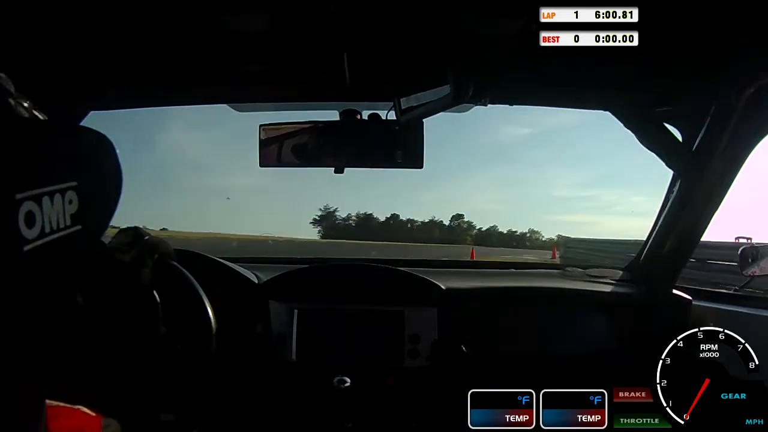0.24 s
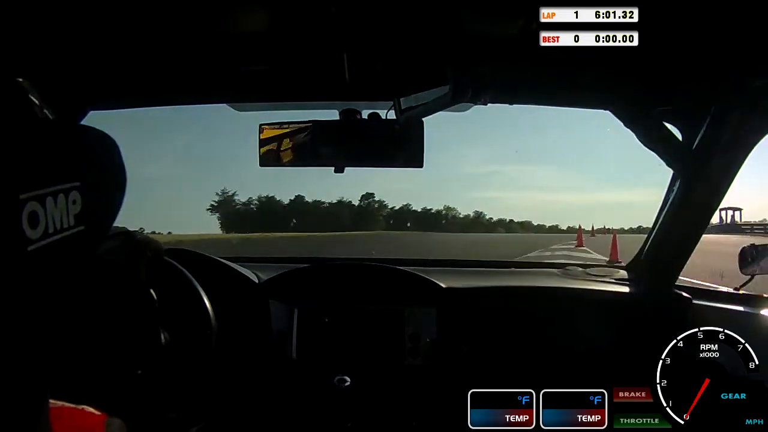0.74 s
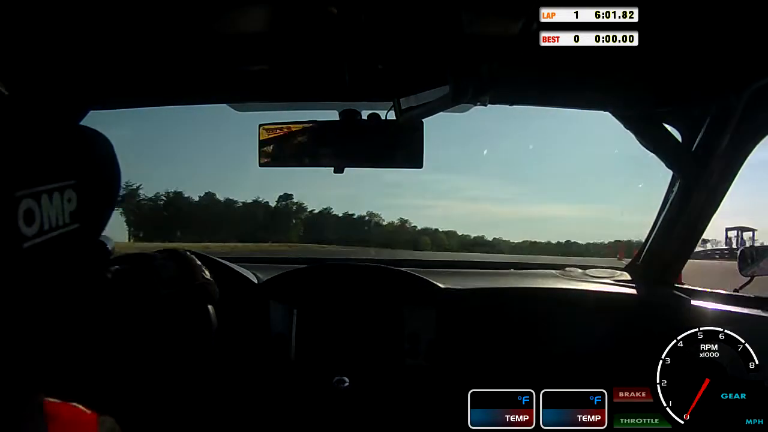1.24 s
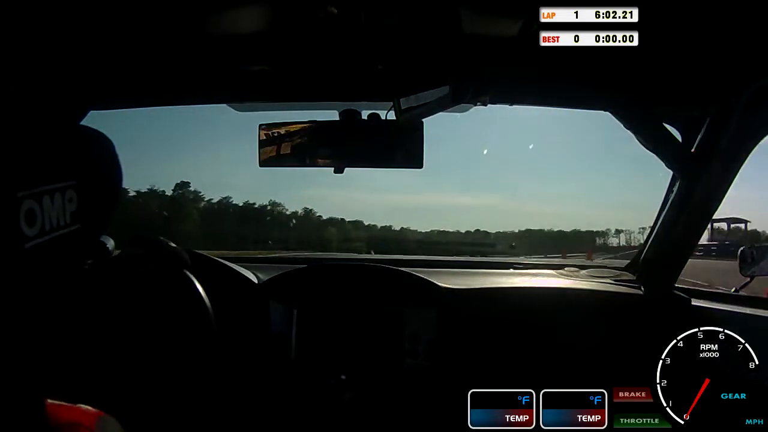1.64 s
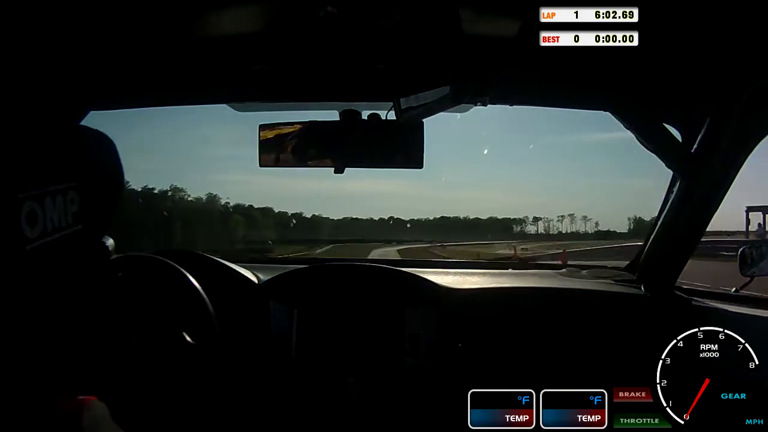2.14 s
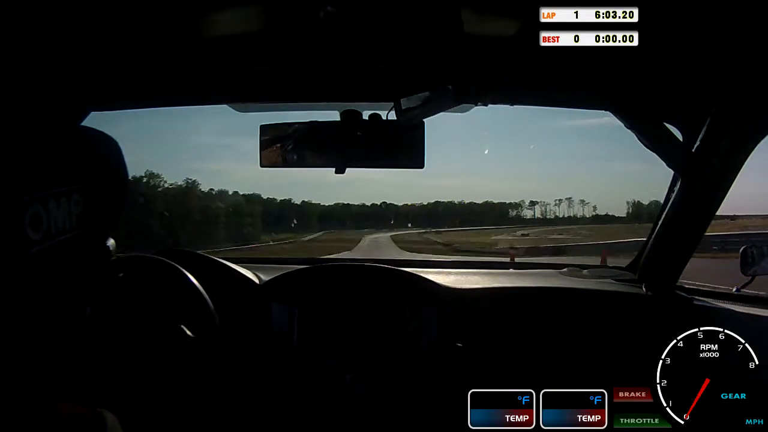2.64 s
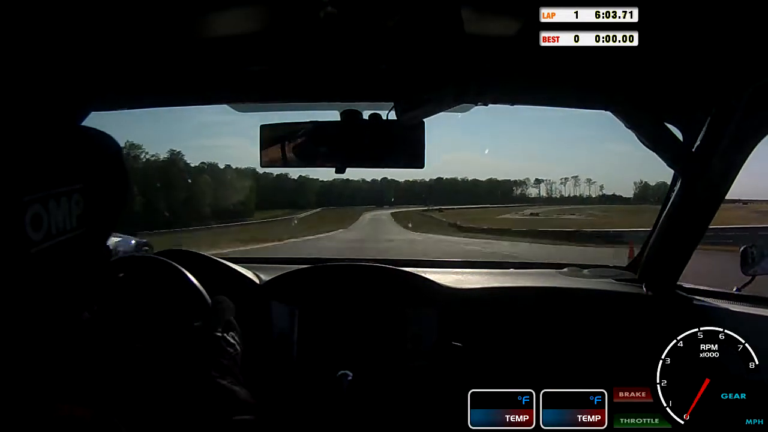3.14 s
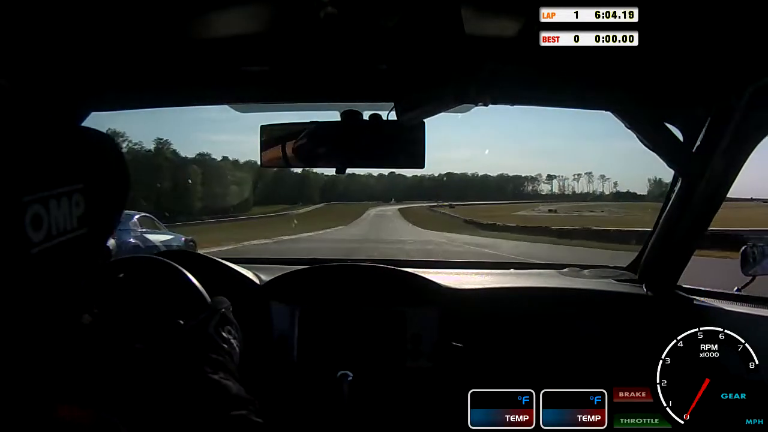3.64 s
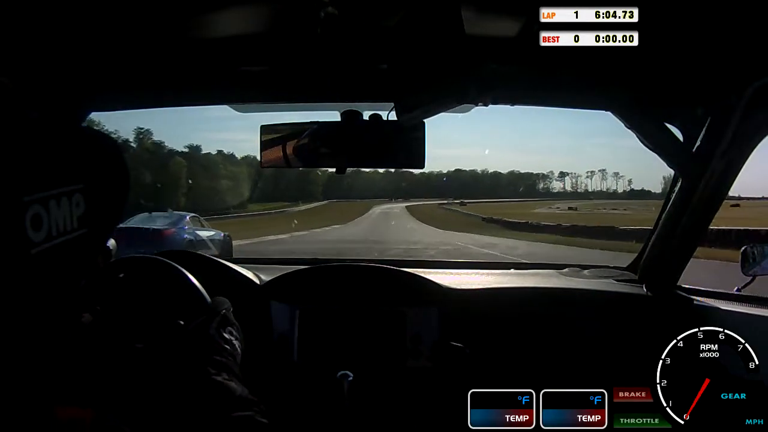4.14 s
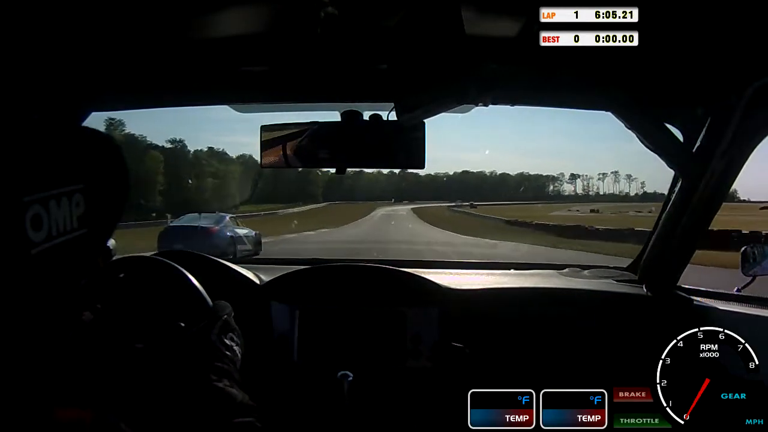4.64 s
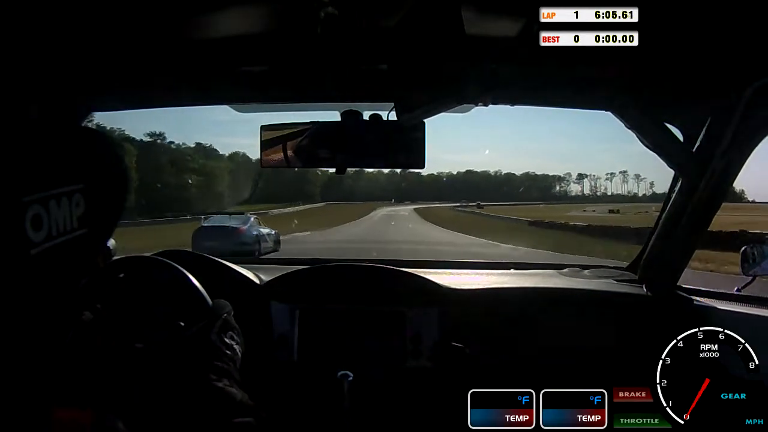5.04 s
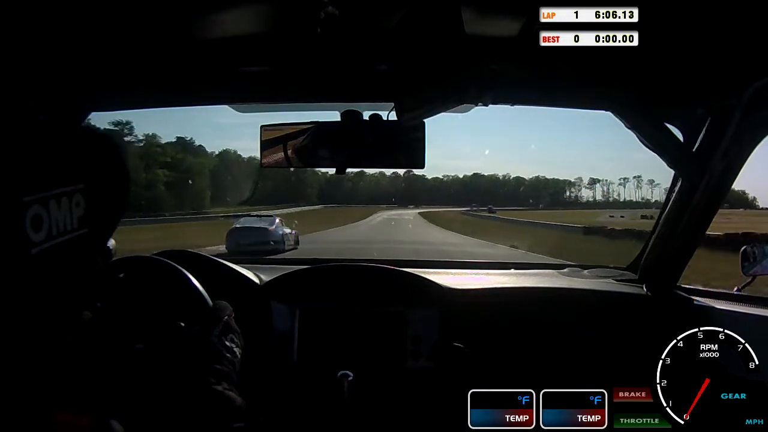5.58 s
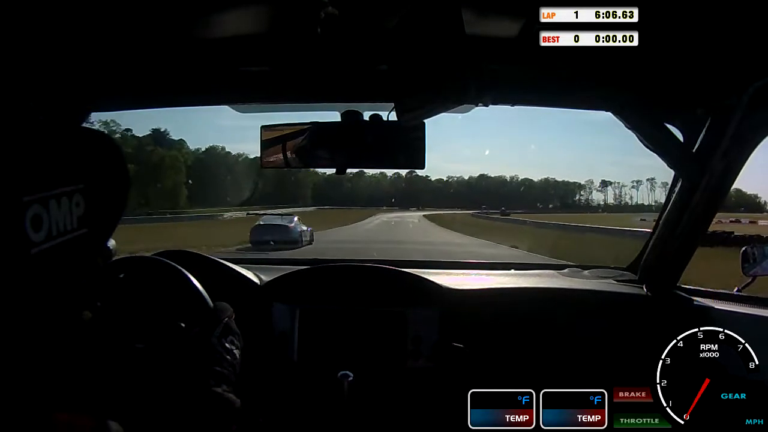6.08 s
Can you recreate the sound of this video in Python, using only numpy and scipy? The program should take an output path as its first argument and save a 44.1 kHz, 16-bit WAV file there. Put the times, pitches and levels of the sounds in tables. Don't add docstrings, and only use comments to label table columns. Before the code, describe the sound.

Inside a hard, boomy racing car cabin, close to a small, slightly overloaded microphone. From 0 to 0.8 s the four-cylinder engine falls on the overrun, its firing note dropping from about 190 to 145 Hz, with thick irregular pops and thumps over road rumble and wind roar. Around 0.85 s a low boom swells briefly, then the clutch lets the engine sink and fade. At 1.4 s a dull gear clunk lands; gearbox hum near 163 Hz, faint high whistle and tiny trim ticks carry a quiet lull while revs sink to about 75 Hz at 2.1 s. At 2.3-2.5 s the throttle opens: revs jump to 150 Hz and a loud raspy bark bursts out with a slight shudder. It then climbs smoothly to about 226 Hz by 6.3 s, steady full-throttle drone with pulsing intake hiss, road noise growing and brief treble dropouts, ending abruptly while still pulling.

```python
import sys
import numpy as np
from scipy import signal
from scipy.io import wavfile
from scipy.ndimage import uniform_filter1d

SR = 44100
rng = np.random.default_rng(int(sys.argv[2]) if len(sys.argv) > 2 else 0)


def inscribe(sig):
    pcm = np.round(np.clip(np.atleast_2d(sig).T, -1, 1) * 32767)
    wavfile.write(sys.argv[1], SR, pcm.astype(np.int16))


def gain_from_db(level_db):
    decades = np.asarray(level_db, float) / 20
    return 10 ** decades


N = 278271

# time in seconds, level in dB.
ROAD = [
    (0, -25),
    (.75, -26),
    (1.05, -29),
    (1.4, -33),
    (2.35, -40.5),
    (2.62, -24),
    (3.0, -34.5),
    (4.2, -29.5),
    (5.0, -28),
    (6.31, -29.5),
]
CLUNK_S, CLUNK_RISE_S = 1.4, 0.02


def blend(pair, share):
    return pair[0] + (pair[1] - pair[0]) * share


def evened(x):
    return x / np.sqrt(np.mean(x ** 2) + 1e-20)


def columns(rows):
    s, *values = np.transpose(rows)
    return [np.interp(np.arange(N) / SR, s, v) for v in values]


def noise(spectrum, patchy_db):
    hz = np.fft.rfftfreq(1024, 1 / SR)
    a, b, patches = rng.standard_normal((N // 256 + 5, 513, 3)).T
    patches = uniform_filter1d(patches, size=8, axis=0)
    patches = evened(uniform_filter1d(patches, size=10, axis=1))
    f, db = np.transpose(spectrum)
    colour_db = np.interp(np.log(hz + 1), np.log(f + 1), db)[:, None]
    z = (a + 1j * b) * gain_from_db(colour_db + patchy_db * patches)
    return evened(signal.istft(z, nperseg=1024, noverlap=768)[1][:N])


def drive():
    # time in seconds, firing rate in Hz, boom in dB, effort in dB.
    controls = [(0, 190.3, -18, -34), (.3, 171, -19.5, -32.5), (.7, 148.3, -22, -30.5),
                (.85, 140.9, -12.5, -27.5), (1.0, 129.4, -12.5, -34), (1.2, 116, -14.5, -39.5),
                (1.6, 97.3, -25, -56), (2.1, 75.3, -30, -42.5), (2.29, 80.54, -32, -39.5),
                (2.35, 97, -19, -25.5), (2.42, 138.9, -11, -15), (2.465, 148.5, -9, -11.5),
                (2.95, 156.2, -13, -13.5), (3.73, 174.2, -12, -16), (4.3, 186, -10, -16),
                (5.3, 206.4, -10.5, -13.5), (5.9, 217.9, -12, -13), (6.31, 226, -12.5, -14)]
    # start in seconds, rev swing in Hz.
    jolts = [
        (2.464, 3.0),
        (3.253, 1.7),
    ]
    jolts_per_s, fade_s = 7.2, .17
    shut_db, open_db = -21.5, -16.5
    hz, boom_db, effort_db = columns(controls)
    t = np.arange(N) / SR
    for s, swing_hz in jolts:
        after_s = np.maximum(t - s, 0)
        hz = hz + swing_hz * np.sin(2 * np.pi * jolts_per_s * after_s) * np.exp(-after_s / fade_s)
    throttle = np.clip((effort_db - shut_db) / (open_db - shut_db), 0, 1)
    gear = np.clip((t - CLUNK_S) / CLUNK_RISE_S + 1, 0, 1)
    return hz, boom_db, effort_db, throttle, gear


def pipe(x, heat, floor_db=-42):
    # frequency in Hz, width in Hz, level in dB.
    resonances = [(220.4, 112, 8.5), (351.4, 60, -1), (465, 101, -2), (626.6, 75, 0), (745.4, 94, 3.5),
                  (832.7, 80, -1.5), (946, 28, -9), (1118, 150, -21.5), (1328, 163, -10), (1830, 154, -18),
                  (2034, 250, -22), (2496, 208, -20.5), (2904, 270, -24), (3478, 165, -23.5),
                  (4137, 165, -29), (5060, 130, -41)]
    hz = abs(np.fft.fftfreq(8192, 1 / SR))
    gain = gain_from_db(floor_db) / (1 + (hz / 2800) ** 6)
    for f, width_hz, db in resonances:
        gain = gain + gain_from_db(db) / (1 + (2 * (hz - f * heat) / width_hz) ** 2)
    taps = np.fft.ifft(np.exp(np.conj(signal.hilbert(np.log(gain))))).real[:3000]
    return signal.oaconvolve(x, taps)[:N]


def boom(hz, turns, size_db, throttle):
    overtone_db, mode_hz, mode_width_hz, lag_rad = -16.5, 238, 52, .65
    size = gain_from_db(.45 * uniform_filter1d(size_db, size=300))
    tone = np.cos(2 * np.pi * turns - lag_rad) * size
    mode = 1 / (1 + (2 * (2 * hz - mode_hz) / mode_width_hz) ** 4)
    overtone = gain_from_db(overtone_db) * (1 - throttle) * mode * np.cos(4 * np.pi * turns)
    return -np.sqrt(2) * (tone + overtone)


def engine(hz, boom_db, bark_db, throttle):
    cylinders_db = [0.48, -0.49, 0.35, -0.46]
    uneven_db = blend((2.2, 1.05), throttle)
    sharp_db = blend((-9, 1.78), throttle) - 0.0053 * throttle * (hz - 185)
    wobble = evened(uniform_filter1d(rng.standard_normal(N), size=900))
    turns = np.cumsum(hz * (1 + .0015 * wobble)) / SR
    firing = np.floor(turns + .5).astype(int)
    chance = np.clip(rng.standard_normal((2000, 2)), -1.6, 1.6)[firing]
    size_db = np.array(cylinders_db)[firing % 4] + uneven_db * chance[:, 0]

    mid_revs = np.exp(-((hz - 196.5) / 29.8) ** 2)
    shift_firings = blend((0.0079, 0.019), throttle * mid_revs)
    drift = shift_firings * np.sin(2 * np.pi * turns / 4 + 0.95)
    arrival = turns + .0014 * uneven_db ** 2 * uniform_filter1d(chance[:, 1], size=60)
    edge = gain_from_db(sharp_db) - 1
    pulses = 0
    for k in range(2, 32):
        level = 1 + edge * np.clip(k * hz / 200 - 4.5, 0, 1)
        pulses = pulses - level * np.cos(2 * np.pi * (k * arrival + min(k, 7) * drift))

    gas = np.diff(rng.standard_normal(N + 1)) * (.4 + np.exp(-(turns % 1) / .35))
    gas_db = 11 + sharp_db - .06 * throttle * (hz - 167)
    flow = pulses * gain_from_db(size_db) + gain_from_db(gas_db) * gas
    hot = throttle * np.clip((hz - 150) / (190 - 150), 0, 1)
    bark = blend((pipe(flow, 0.98), pipe(flow, 1.005)), hot)
    bark /= np.sqrt(abs(uniform_filter1d(bark ** 2, size=6000)) + 1e-9)
    return gain_from_db(boom_db) * boom(hz, turns, size_db, throttle) + gain_from_db(bark_db) * bark, turns


def rumble(hz, throttle):
    # frequency in Hz, density in dB per Hz.
    rumble_colour = [(12, -42.5), (20, -3.5), (48, -2.5), (110, 2), (140, -34.5), (240, -120)]
    road_db, = columns(ROAD)
    level_db = -35.5 + .5 * (road_db + 32.5) - 0.0769 * throttle * (hz - 150)
    return gain_from_db(level_db) * noise(rumble_colour, patchy_db=2.5)


def clunk(gear):
    peak_db, fade_s = 7.5, 0.023
    after_s = np.maximum(np.arange(N) / SR - CLUNK_S, 0)
    return peak_db * gear * np.exp(-after_s / fade_s)


def roar(turns, throttle, gear):
    # frequency in Hz, density in dB per Hz.
    roar_colour = [(53, -49), (90, -24), (113, -6), (135, -15), (309, -14.5), (347, -24), (445, -17.5),
                   (500, -43.5), (561, -17.5), (707, -18.5), (982, -34.5), (1820, -38), (9000, -68),
                   (11700, -101), (19800, -120)]
    # frequency in Hz, density in dB per Hz.
    rattle_colour = [(120, -42.5), (200, -10.5), (233, -9), (313, -18), (413, -22.5), (475, -14.5),
                     (580, -24.5), (646, -17), (894, -24.5), (1630, -25.5), (8000, -59.5), (10400, -90),
                     (17600, -120)]
    free, in_gear, loaded = 0.017, 0.71, 0.36
    road_db, = columns(ROAD)
    rattle = blend((blend((free, in_gear), gear), loaded), throttle)
    throb = 1 + 0.13 * np.cos(2 * np.pi * turns - .6)
    cabin = np.sqrt(1 - rattle) * noise(roar_colour, patchy_db=2.8)
    cabin = cabin + np.sqrt(rattle) * noise(rattle_colour, patchy_db=2.0)
    return gain_from_db(road_db + clunk(gear)) * throb * cabin


def intake(turns, hz, effort_db, throttle, gear):
    # frequency in Hz, density in dB per Hz.
    hiss_colour = [(2650, -31), (4500, 8.5), (5120, -35), (6380, -9.5), (7340, -1), (11300, -0.5),
                   (15600, -13)]
    level_db = -52 + 0.53 * (effort_db + 14.5) + 0.0472 * throttle * (hz - 185) + clunk(gear)
    tilt_db = blend((-7, 1.5), throttle) - 1.5 * gear * (1 - throttle)
    puff_db = rng.standard_normal(2000)[np.floor(turns).astype(int)]
    puffs = (0.13 + np.exp(-(turns % 1) / 0.27)) * gain_from_db(puff_db)
    hiss = noise(hiss_colour, patchy_db=1.4)
    dull = signal.sosfiltfilt(signal.butter(2, 8500, fs=SR, output="sos"), hiss)
    hiss = dull + gain_from_db(2.2 * tilt_db) * (hiss - dull)
    return gain_from_db(level_db) * evened(puffs) * hiss


def pops():
    # start in seconds, peak in dB, treble in dB, thump in dB.
    burns = [(0.031, -24, -27, 4), (0.076, -12, -22, 4.5), (0.109, -23, -26, 6.5), (0.128, -17, -18, 2.5),
             (0.145, -19, -26, -5), (0.182, -14.5, -21, 5), (0.23, -17, -32, 4.5), (0.273, -13, -15, 0.5),
             (0.312, -9, -36, -0.5), (0.367, -9.5, -24.5, -2), (0.404, -17, -17.5, -4),
             (0.433, -13.5, -25, -2), (0.477, -23.5, -23, 9.5), (0.52, -21, -10.5, 7.5),
             (0.574, -19.5, -15, 0), (0.644, -16, -19, -5), (0.776, -24, -16, -4), (0.814, -29, -24, -6),
             (1.399, -19, -18, -1.5)]
    # frequency in Hz, level in dB, t60 in seconds.
    modes = [(142.5, 9.5, 0.23), (174, 6, 0.12), (628, 8, 0.022), (765, -1.5, 0.038)]
    out, t = np.zeros(N + 6000), np.arange(6000) / SR
    for s, db, treble_db, thump_db in burns:
        ring = 0
        for f, mode_db, t60_s in modes:
            if f < 300:
                mode_db = mode_db + thump_db - 2.5
            detuned_hz = f * rng.uniform(.94, 1.034)
            ring = ring - gain_from_db(mode_db - 60 * t / t60_s) * np.sin(2 * np.pi * detuned_hz * t)
        crack = signal.lfilter([1, 0, -1], [1, -1.6, .72], rng.standard_normal(6000))
        crack = signal.lfilter([.4], [1, -.6], crack) * gain_from_db(treble_db - 5.5 - 60 * t / 0.023)
        out[round(s * SR):][:6000] += gain_from_db(db - 6) * (ring * np.tanh(t / 0.0013) + crack)
    return out[:N]


def ticks():
    # start in seconds, peak in dB.
    trim = [(0.0603, -56), (0.0877, -52), (0.2657, -45.5), (0.2992, -59), (0.497, -39.5), (0.522, -46.5),
            (0.613, -42), (0.8155, -44.5), (0.848, -52), (1.1517, -62.5), (1.3798, -51.5), (1.6571, -58),
            (1.6704, -53.5), (1.716, -56), (1.746, -62), (1.7953, -60), (1.8387, -61.5), (2.0078, -51),
            (2.1111, -55), (2.1355, -56), (2.2897, -58)]
    out, t = np.zeros(N), np.arange(800) / SR
    for s, db in trim:
        out[round(s * SR):][:800] += rng.standard_normal(800) * gain_from_db(db - 60 * t / 0.016)
    return signal.sosfilt(signal.butter(2, [6000, 12500], "bandpass", fs=SR, output="sos"), out)


def gearbox(throttle):
    # time in seconds, frequency in Hz, hum in dB.
    shaft = [
        (0, 162.6, -60),
        (.6, 160.7, -23),
        (1.29, 154.1, -27),
        (1.33, 167.2, -31),
        (1.45, 163, -21.5),
        (2.35, 164.6, -22),
        (2.6, 169.9, -23.5),
        (3.9, 196.9, -35.5),
        (6.31, 249, -45),
    ]
    # multiple of shaft frequency, level in dB.
    orders = [(.75, -17.5), (1, -0.5), (1.75, -17), (2, -7), (3, -11.5), (4, -15.5), (5, -22.5), (6, -26.5),
              (6.75, -21.5), (7, -23.5), (8, -25.5)]
    sync_s = 1.32
    free_db, in_gear_db, loaded_db = -37.5, -30.5, -32
    hz, hum_db = columns(shaft)
    synced = np.clip((np.arange(N) / SR - sync_s) / CLUNK_RISE_S + 1, 0, 1)
    mesh_db = blend((blend((free_db, in_gear_db), synced), loaded_db), throttle)
    wobble = evened(uniform_filter1d(rng.standard_normal(N), size=1500))
    turns = np.cumsum(hz * (1 + 0.003 * wobble)) / SR
    hum = 0
    for k, db in orders:
        sway = evened(uniform_filter1d(rng.standard_normal(N), size=1200))
        base_db = mesh_db if k > 1 else hum_db
        level = gain_from_db(base_db + db + (0.95 + 0.27 * k) * sway)
        hum = hum + level * np.cos(2 * np.pi * k * turns + k * k)
    return np.sqrt(2) * hum


def whistle(throttle, gear):
    pitch_hz, level_db, rest_db, sag_db_per_s = 4480, -61, -71, 8
    t = np.arange(N) / SR
    sag_db = sag_db_per_s * (t - CLUNK_S)
    level_db = blend((rest_db, level_db - sag_db), gear * (1 - throttle))
    a, b = uniform_filter1d(uniform_filter1d(rng.standard_normal((2, N)), size=130), size=130)
    return gain_from_db(level_db) * evened(((a + 1j * b) * np.exp(2j * np.pi * pitch_hz * t)).real)


def scene():
    hz, boom_db, effort_db, throttle, gear = drive()
    exhaust, turns = engine(hz, boom_db, effort_db, throttle)
    air = rumble(hz, throttle) + roar(turns, throttle, gear) + intake(turns, hz, effort_db, throttle, gear)
    return (exhaust + air + pops() + ticks() + gearbox(throttle) + whistle(throttle, gear))[None]


def top_cut(x):
    return signal.sosfilt(signal.butter(12, 15750, fs=SR, output="sos"), x)


def record(dry):
    # centre in seconds, length in seconds, edge in Hz, depth in dB.
    gaps = [(2.446, 0.018, 3810, -18), (2.544, 0.017, 5350, -13), (2.586, 0.024, 5430, -11.5),
            (2.694, 0.032, 4576, -63), (2.935, 0.025, 5440, -12), (3.306, 0.014, 5365, -17),
            (4.983, 0.02, 4830, -13), (5.514, 0.028, 5260, -14), (5.69, 0.035, 5614, -57),
            (5.945, 0.033, 5330, -55), (6.026, 0.019, 4630, -15), (6.165, 0.016, 4516, -16),
            (6.212, 0.01, 5220, -24.5), (1.353, 0.023, 4800, -9), (1.632, .012, 4600, -19),
            (1.705, 0.017, 4600, -17), (1.77, 0.015, 3324, -5)]
    knee, room = .46, .25
    x = np.where(dry < -knee, -knee - room * np.tanh((-dry - knee) / room), dry)
    from_end = np.minimum(np.arange(N), np.arange(N)[::-1])
    x = x * np.clip(from_end / 90, 0, 1)
    hz, t, z = signal.stft(x, SR, nperseg=256)
    kept_db = 0
    for s, length_s, edge_hz, depth_db in gaps:
        inside = np.clip((length_s / 2 - abs(t - s)) / .003 + .5, 0, 1)
        above = np.clip((hz - edge_hz) / 200, 0, 1)
        kept_db = kept_db + depth_db * np.outer(above, inside)
    lost = signal.istft(z * (1 - gain_from_db(kept_db)), SR, nperseg=256)[1][:, :N]
    return top_cut(x - lost - .003)


dry = scene()
out = record(dry)
inscribe(out)
```